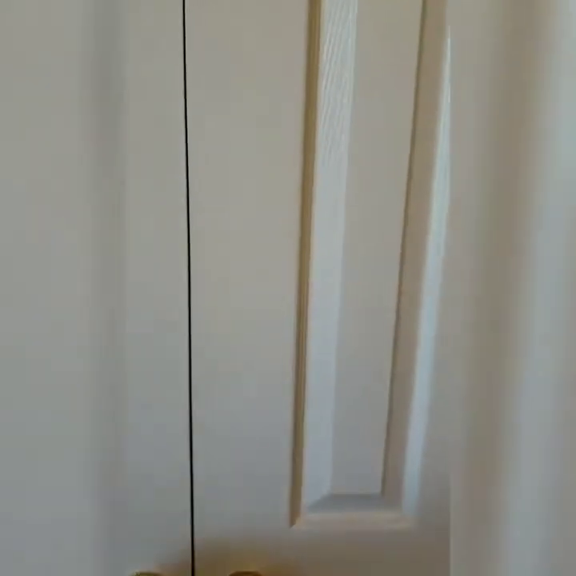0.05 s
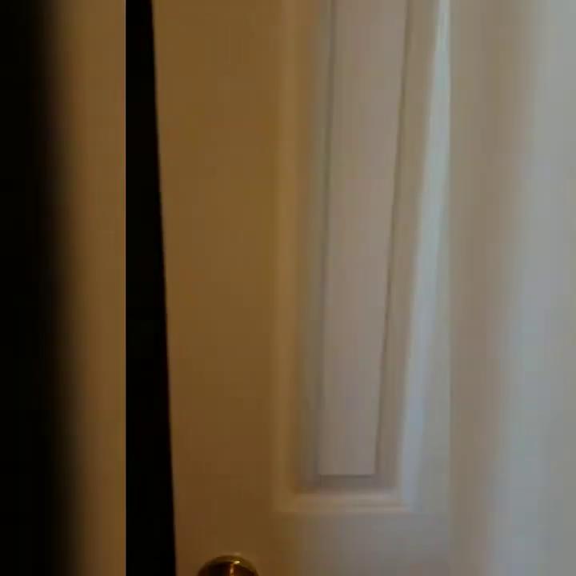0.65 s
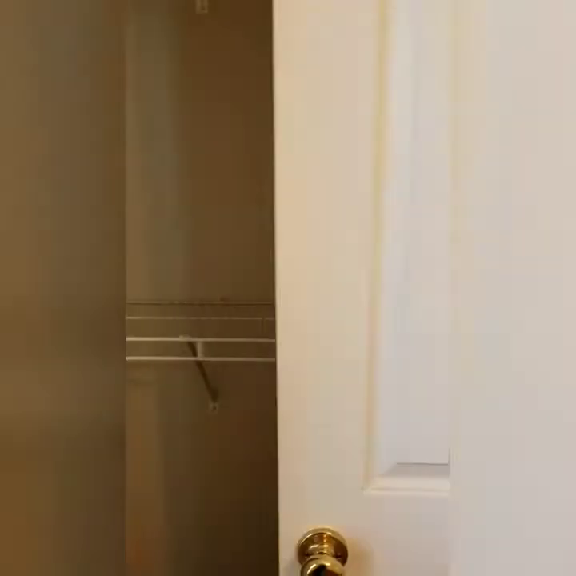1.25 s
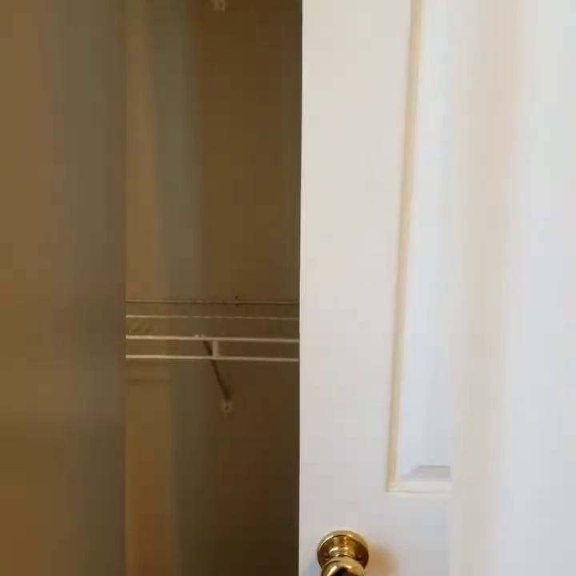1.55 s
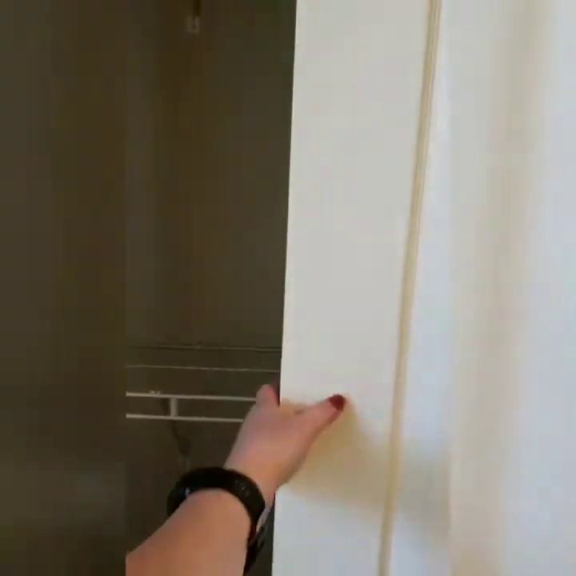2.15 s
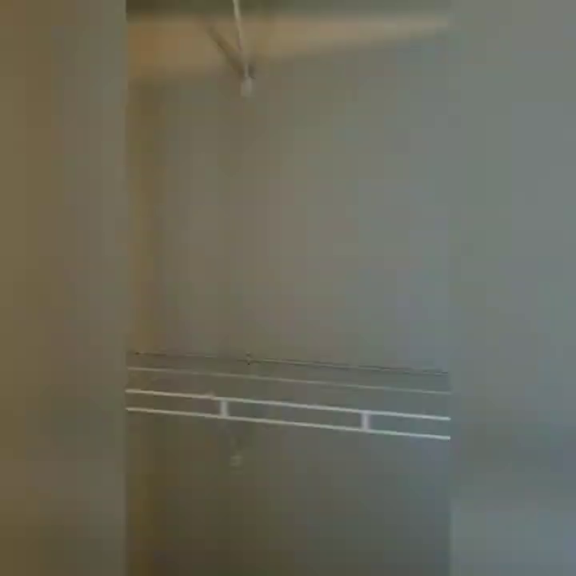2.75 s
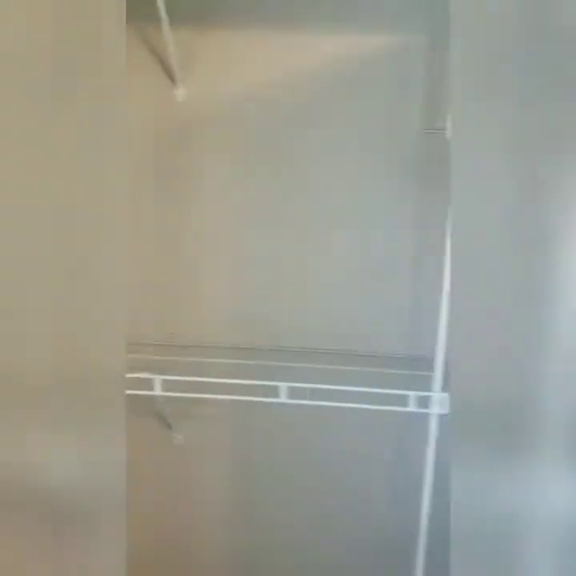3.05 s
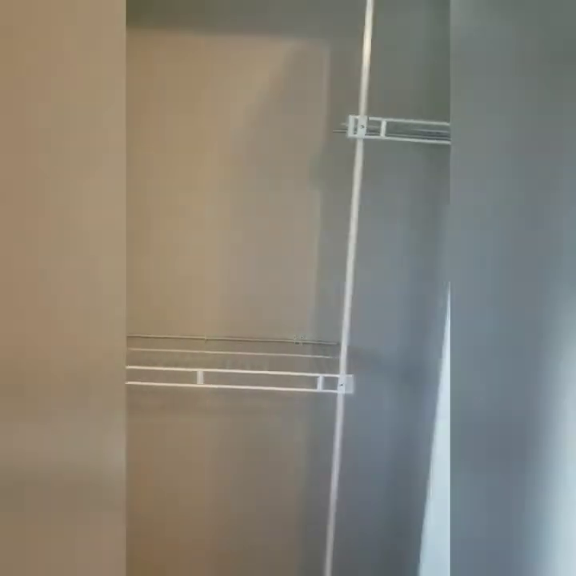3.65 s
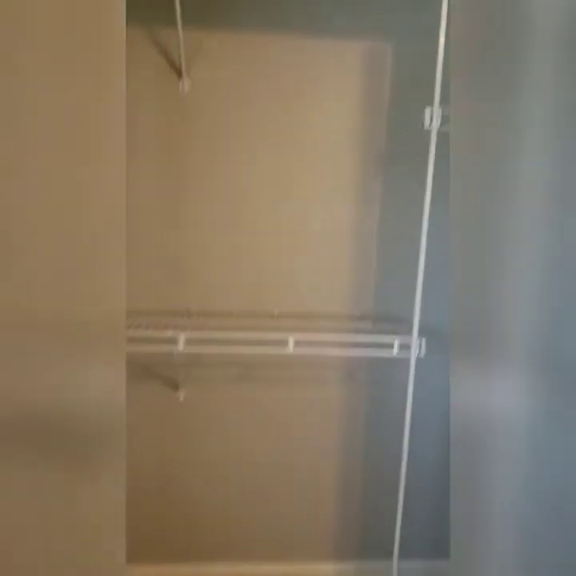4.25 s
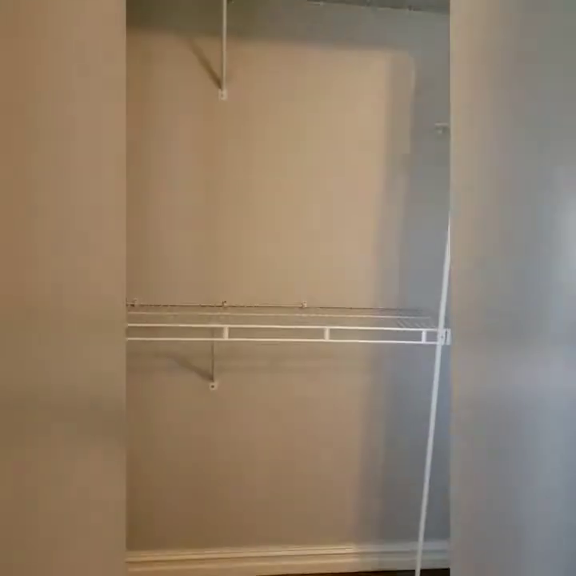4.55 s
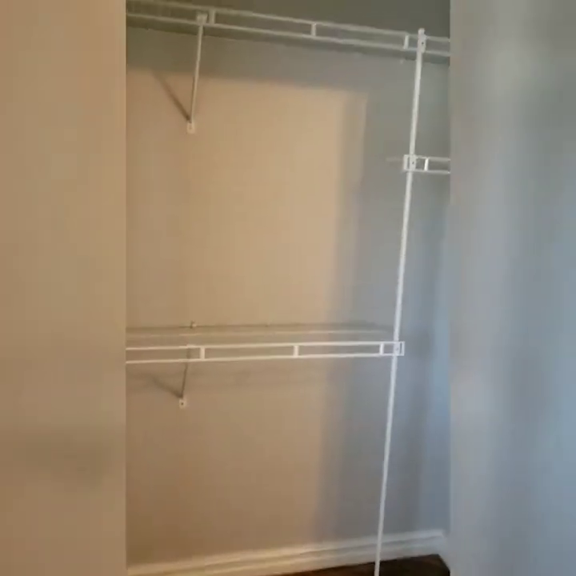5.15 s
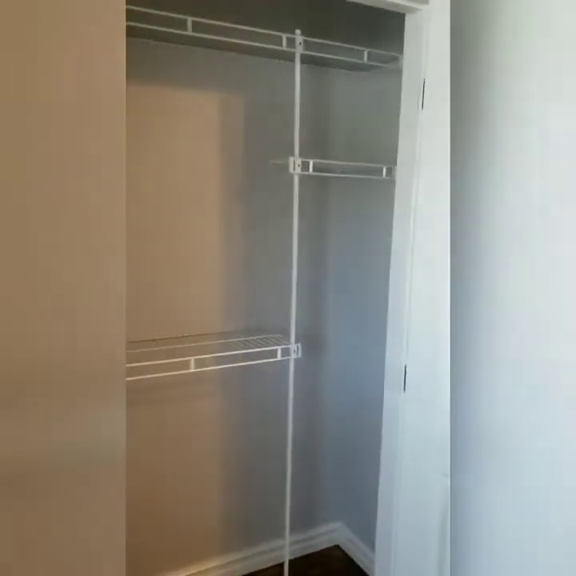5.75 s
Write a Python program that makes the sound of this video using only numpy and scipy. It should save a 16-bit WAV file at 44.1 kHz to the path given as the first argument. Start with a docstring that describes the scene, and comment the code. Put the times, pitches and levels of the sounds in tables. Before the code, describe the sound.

Closet doors pop and drag open one after the other in a bare room, followed by soft cloth rustle and one sharp, close click.

```python
"""An empty, ringing room, heard from the two microphones of a hand-held phone near two hollow closet doors.
Ventilation hums underneath and clothes swish as the person reaches out. At 0.5 s the first door pops out of
its ball catch; from 2.2 s the second drags on the frame until its catch lets go. Shifting weight bumps the
floor. From 3.9 s the ventilation fades as the phone moves into the closet; cloth rasps as the body turns,
and at 4.6 s a finger clicks against the case, right at the microphones."""
import sys
import numpy as np
from scipy import signal
from scipy.fft import rfft, irfft, next_fast_len
from scipy.io import wavfile
from scipy.ndimage import uniform_filter1d, map_coordinates

SR = 44100
rng = np.random.default_rng(int(sys.argv[2]) if len(sys.argv) > 2 else 0)


def put_to_file(sound):
    """Save the sound as 16-bit audio at rate SR, in the file named by the first command-line argument."""
    columns = np.atleast_2d(sound).T  # one column per channel
    safe = np.clip(columns, -1, 1)
    whole_steps = np.round(safe * 32767)
    wavfile.write(sys.argv[1], SR, whole_steps.astype(np.int16))


N = 264550
MIC_DELAY_S = .00045  # sound's travel time between the two microphones


def amp(db):
    """Decibels to gain."""
    return 10 ** (np.asarray(db) / 20)


def unit(x):
    """Scale to rms 1."""
    return x / np.sqrt(np.mean(x ** 2) + 1e-20)


def along(points, hz):
    """(Hz, value) points read on a log axis."""
    freqs, values = np.transpose(points)
    return np.interp(np.log(hz + 1), np.log(freqs + 1), values)


def wobble(rate):
    """A smooth random curve, rate knots a second."""
    knots = rng.standard_normal(int(N * rate / SR) + 4)
    return map_coordinates(knots, [np.arange(N) * rate / SR])


def filtered(x, response):
    """x times a response of frequency."""
    n = x.shape[-1]
    padded = next_fast_len(n + SR // 4)
    return irfft(rfft(x, padded) * response(np.fft.rfftfreq(padded, 1 / SR)), padded)[..., :n]


def low_cut(x, hz, order=2):
    """x with its bass rolled off below hz."""
    return signal.sosfilt(signal.butter(order, hz, 'high', fs=SR, output='sos'), x)


def coloured(x, spectrum):
    """x with the given spectrum, at rms 1."""
    return unit(filtered(x, lambda hz: amp(along(spectrum, hz))))


def diffuse(size):
    """Noise from all sides: alike at both microphones in the bass, unrelated in the treble."""
    angle = lambda hz: np.arccos(.97 * np.sinc(2 * hz * MIC_DELAY_S)) / 2
    white = rng.standard_normal((2, size))
    mid, side = filtered(white, lambda hz: np.array([np.cos(angle(hz)), np.sin(angle(hz))]))
    return np.array([mid + side, mid - side])


def rush(spectrum, size=N):
    """Diffuse stereo noise with the given spectrum, at rms 1."""
    return coloured(diffuse(size), spectrum)


def add(track, s, sound):
    """Mix a sound in at time s."""
    part = track[..., round(s * SR):][..., :sound.shape[-1]]
    part += sound[..., :part.shape[-1]]


def onset(t, rise_s):
    """Gain swelling to 1 with time constant rise_s."""
    return 1 - np.exp(-t / rise_s)


def stroke(s, rise_s, t60, db):
    """Gain of one rubbing movement: it gathers speed smoothly, then dies away."""
    t = np.arange(N) / SR - s
    swell = np.sin(np.pi / 2 * np.clip(t / rise_s, 0, 1)) ** 2
    return swell * amp(db - 60 * np.maximum(t - rise_s, 0) / t60)


def ring(modes, t):
    """Damped modes, at slightly new strengths for each blow."""
    return sum(amp(db + rng.standard_normal() - 60 * t / t60) * np.sin(2 * np.pi * hz * t)
               for hz, db, t60 in modes)


def ring_from_left(modes, t):
    """Damped modes that reach the left microphone first."""
    return np.array([ring(modes, t), ring(modes, np.maximum(t - MIC_DELAY_S, 0))])


def soft(hz, corner_hz):
    """Gain of a contact of limited hardness: it excites little above its corner."""
    return 1 / np.sqrt(1 + (hz / corner_hz) ** 6)


def struck(modes, corner_hz):
    """The modes as such a contact excites them: the high ones stay nearly still."""
    return [(hz, db + 20 * np.log10(soft(hz, corner_hz)), t60) for hz, db, t60 in modes]


# moving air, out in the room: (frequency [Hz], density [dB])
VENT_SPECTRUM = [(20, -19.5), (90, -16.5), (120, -1), (160, -17), (290, -6.5), (390, -8), (490, -12),
                 (600, -26.5), (1000, -33), (3000, -43.5), (7000, -39), (9000, -46.5), (12000, -35.5),
                 (16000, -46)]

def ventilation():
    """A low rush of air and an unsteady motor hum; both fade as the phone enters the closet."""
    shelter_s, air_fade_db_per_s, hum_fade_db_per_s = 3.9, 3, 7.5
    hum_hz, drift_hz, swell_db = 121.8, 0.45, 3
    inside_s = np.maximum(np.arange(N) / SR - shelter_s, 0)
    phase = 2 * np.pi * np.cumsum(hum_hz + drift_hz * wobble(8.3)) / SR
    hum = unit(amp(swell_db * wobble(14)) * np.sin(phase))
    air = amp(-55 - air_fade_db_per_s * inside_s) * rush(VENT_SPECTRUM)
    return air + amp(-60.5 - hum_fade_db_per_s * inside_s) * hum


# cloth within arm's length of the microphones: (frequency [Hz], density [dB])
SLEEVE_SPECTRUM = [(350, -44.5), (700, -17), (1130, -30), (1550, -2), (1900, -3.5), (2950, -3),
                   (4050, -6.5), (6400, -6.5), (8600, -15), (14700, -13), (16000, -16.5)]
SHIRT_SPECTRUM = [(410, -3), (700, -0.5), (1060, -5), (1170, -5.5), (1260, -3), (2080, -6.5), (4550, -8.5),
                  (5400, -11), (7490, -10), (8210, -17), (11500, -13.5), (14500, -21), (16000, -17)]
# the arm reaches out, then the body turns: (time [s], rise [s], t60 [s], level [dB], shirt share [0-1])
CLOTH_SWISHES = [(0, 0.0033, 12, -57.5, 0.23), (.12, 0.15, 2.8, -57, 0.36), (1.515, 0.02, 1.26, -59, 1),
                 (1.57, 0.13, 0.6, -51.5, 0.03), (1.899, 0.12, 1.4, -58, 0.05),
                 (2.669, 0.045, 4.0, -54.5, 0.8), (3.02, 0.061, 0.98, -49.5, 0.13),
                 (3.76, 0.28, 4.1, -57.5, 0.35), (4.28, 0.018, 4.1, -52, 0.9), (4.33, 0.17, 0.15, -48, 0.6),
                 (4.599, 0.18, 0.92, -50, 1), (4.93, 0.11, 3, -56.5, 0.5), (5.21, 0.04, 0.97, -52, 0.53)]

def clothes():
    """Cloth brushes on cloth in small uneven snags; each swish is part sleeve, part shirt."""
    sleeve_power, shirt_power = np.zeros((2, N))
    for s, rise_s, t60, db, shirt_share in CLOTH_SWISHES:
        power = stroke(s, rise_s, t60, db) ** 2
        sleeve_power += (1 - shirt_share) * power
        shirt_power += shirt_share * power
    snags = unit(amp(.9 * wobble(35) + 1.5 * wobble(600)))
    sleeve = np.sqrt(sleeve_power) * rush(SLEEVE_SPECTRUM)
    shirt = np.sqrt(shirt_power) * rush(SHIRT_SPECTRUM)
    return snags * (sleeve + shirt)


# resonances of catch, knob and skin, one list a door: (frequency [Hz], width [Hz], level [dB])
DOOR_HARDWARE = [
    [(815, 70, 4), (1076, 36, -2), (1320, 21, 2), (1503, 94, 0.5), (1820, 110, -1.5), (2250, 69, -4.5),
     (2470, 52, -2), (2660, 56, 0.5), (2884, 130, -1), (3856, 76, -4.5), (4310, 130, -1.5)],
    [(825, 21, -9), (920, 25, -9.5), (1070, 27, -13.5), (1407, 50, -10.5), (1500, 50, -6), (1680, 30, -7.5),
     (1900, 34, -5.5), (2144, 77, -3), (2580, 47, -11), (2845, 63, -5), (2980, 70, -13), (3330, 70, -6),
     (3930, 97, -2.5), (4360, 96, 1.5), (4950, 82, -7)],
]

def contact(hz, corner_hz, door):
    """A softer contact excites less treble; the door's hardware lifts its own resonances."""
    lift_db = (3, 4.5)[door]
    peaks = sum(amp(db + lift_db) ** 2 / (1 + (2 * (hz - centre) / width) ** 2)
                for centre, width, db in DOOR_HARDWARE[door])
    return np.sqrt(.45 + peaks) * soft(hz, corner_hz)


# an edge rubbing on the frame, one list a door: (time [s], rise [s], t60 [s], relative level [dB])
DOOR_DRAGS = [
    [(.389, 0.013, 0.41, -42.5)],
    [(2.206, 0.011, 0.78, -29.5), (2.225, 0.12, 0.26, -23)],
]
# friction heard through the wood: (frequency [Hz], density [dB])
SCRAPE_SPECTRUM = [(25, -13.5), (115, -16.5), (168, 3), (232, -6.5), (303, 3), (355, -12), (425, 6),
                   (520, -2.5), (600, 0.5), (700, -12), (830, -9), (1000, -9.5), (1400, -14.5),
                   (2900, -14.5), (3600, -23), (5300, -29), (6800, -26), (9300, -43), (14000, -31.5)]

def door_drags():
    """The door edge sticks and slips on the frame at an uneven rate; each slip is a burst of friction."""
    typical_slip_hz, spread_db, burst_t60, corner_hz = 110.06, 3.5, .022, 12000
    slip_count = np.floor(np.cumsum(typical_slip_hz * amp(3 * wobble(60))) / SR)
    slips = np.diff(slip_count, prepend=0) * amp(spread_db * rng.standard_normal(N))
    burst = amp(-60 * np.arange(SR // 20) / SR / burst_t60)
    rattle = signal.fftconvolve(slips, burst)[:N] + .15  # some steady rub between slips
    friction = coloured(rattle * diffuse(N), SCRAPE_SPECTRUM)
    scrape = np.zeros((2, N))
    for door, drags in enumerate(DOOR_DRAGS):
        pull = sum(stroke(*drag) for drag in drags)
        scrape += pull * unit(filtered(friction, lambda hz: contact(hz, corner_hz, door)))
    return amp(-2) * scrape + amp(-3.5) * room(scrape)


# reverberation of the bare room around the microphones: (frequency [Hz], t60 [s])
ROOM_DECAY = [(60, 1.1), (160, 0.36), (420, 1.14), (1100, 1.7), (2900, 1.06), (7000, 1.06), (15000, 0.61)]

def room_tail(noise):
    """Noise as a tail in the bare room: it builds up, beats unevenly and lasts longest in the mids."""
    hz, t, bands = signal.stft(noise, SR, nperseg=512)
    beating = uniform_filter1d(rng.standard_normal(bands.shape[1:]), size=2, axis=0)
    beating = unit(uniform_filter1d(beating, size=6, axis=1))
    depth_db = 3 * np.clip(hz[:, None] / 1000, 0, 1)
    decay_db = 60 * t / along(ROOM_DECAY, hz)[:, None]
    tail = signal.istft(bands * amp(depth_db * beating - decay_db), SR, nperseg=512)[1]
    return tail * onset(np.arange(tail.shape[1]) / SR, rise_s=0.0011)


def room(x):
    """The room's answer to a sound, reaching the microphones from all sides."""
    tail = room_tail(diffuse(3 * SR // 2))
    return signal.fftconvolve(x.mean(0, keepdims=True), tail / np.linalg.norm(tail[0]), axes=1)[:, :N]


# jolts at arm's length, one list a door; levels are relative within each column:
# (time [s], panel thud [dB], panel ring [dB], edge crack [dB], hardness corner [Hz])
DOOR_JOLTS = [
    [(.391, -35, -40, -37, 6600), (.394, -26, -29.5, -69, 188), (.403, -26.5, -33.5, -36, 3020),
     (0.427, -29, -43, -37.5, 6050), (.4893, -37, -59, -13.5, 19100), (.502, -14.5, -20.5, -50, 12100),
     (.562, -22, -30, -25, 13900), (.655, -30, -34, -38, 2500), (.757, -30.5, -29.5, -43, 1100),
     (.793, -24.5, -34.5, -47, 700), (.928, -37.5, -39, -66, 600)],
    [(2.211, -26, -43, -29.5, 6140), (2.218, -28, -29, -36, 3000), (2.251, -22.5, -36, -30, 1200),
     (2.284, -23, -24, -30, 1100), (2.315, -19, -22.5, -24, 1200), (2.338, -26, -31, -25, 10400),
     (2.347, -32, -33, -25.5, 3300), (2.377, -39, -38.5, -22.5, 2500), (2.405, -37, -35, -29, 1790),
     (2.492, -46, -50, -38, 2300), (2.511, -40, -40.5, -43, 1100), (3.641, -58, -61, -64, 900)],
]
# the hollow panel, one list a door: (frequency [Hz], level [dB], t60 [s])
PANEL_MODES = [
    [(48, -6.5, 0.15), (87, -17, 0.18), (116, -17, 0.22), (160.2, -6.5, 0.35), (183, -18.5, 0.27),
     (268.4, -10, 0.57), (292, 1, 0.13), (325, 6, 0.056), (385, -7, 0.31), (467.6, -9, 0.31),
     (510.6, 2, 0.12), (803, -15.5, 0.47)],
    [(38, -10, 0.19), (90, -24, 0.2), (155, 0, 0.18), (181.5, 1.5, 0.16), (304.8, 4, 0.2),
     (326.4, -5.5, 0.4), (398.5, -3.5, 0.53), (433, -8.5, 0.55), (453, -12, 0.8), (512, -12.5, 0.77),
     (575, -15, 0.65), (629, -14, 0.43)],
]
# the panel's dense, quickly damped modes, and the edge's crack: (frequency [Hz], density [dB])
THUD_SPECTRUM = [(20, -13), (60, 0), (120, 6.5), (300, 6.5), (520, -5), (700, -5), (1500, -41.5),
                 (4000, -51), (8000, -78)]
CRACK_SPECTRUM = [(150, -31), (490, 3), (830, -3.5), (1100, -3.5), (1600, -1), (2500, -2.5), (2950, -2.5),
                  (3450, -4), (3900, -1.5), (5000, -5.5), (7000, -5.5), (8600, -11.5), (11700, -8),
                  (16000, -20.5)]

def door_jolts():
    """Each jolt booms the door's hollow panel, cracks its edge and rings its hardware."""
    thud_t60, crack_t60 = 0.011, 0.056
    t = np.arange(3 * SR // 2) / SR
    boom_t = t[:SR // 2]
    booms, knocks = np.zeros((2, 2, N))
    thuds, cracks = rush(THUD_SPECTRUM), rush(CRACK_SPECTRUM)
    piece = lambda noise: noise[:, rng.integers(N - len(t)):][:, :len(t)]
    for door, (panel, jolts) in enumerate(zip(PANEL_MODES, DOOR_JOLTS)):
        for s, thud_db, ring_db, crack_db, corner_hz in jolts:
            boom = ring(struck(panel, corner_hz), boom_t) * onset(boom_t, rise_s=0.0027)
            add(booms, s, amp(ring_db) * boom)
            thud = amp(thud_db) * filtered(piece(thuds), lambda hz: soft(hz, corner_hz))
            crack = amp(crack_db) * filtered(piece(cracks), lambda hz: contact(hz, corner_hz, door))
            direct = thud * amp(-17 - 60 * t / thud_t60) + crack * amp(-3.5 - 60 * t / crack_t60)
            add(knocks, s, direct * onset(t, rise_s=0.001))
            add(knocks, s, amp(crack_db - 17.5) * hardware_ring(door, corner_hz))
            add(knocks, s, room_tail(amp(-10.5) * thud + amp(-9) * crack))
    return booms + amp(-6) * room(booms) + knocks


def hardware_ring(door, corner_hz):
    """The jolted hardware rings as separate tones, the narrowest longest."""
    t = np.arange(SR // 5) / SR
    modes = [(hz, db, np.log(1000) / np.pi / width) for hz, width, db in DOOR_HARDWARE[door]]
    return ring_from_left(struck(modes, corner_hz), t) * onset(t, rise_s=0.0033)


# each door's ball catch lets go: (time [s], level [dB])
CATCH_SNAPS = [(0.4889, -17), (2.338, -31)]
# the ball's snap: (frequency [Hz], density [dB])
CATCH_SPECTRUM = [(1500, -21.5), (2800, 5), (3450, -10.5), (3900, 4), (7000, 4), (9000, -19), (12000, -3),
                  (16000, -11)]
# the catch and its strike plate: (frequency [Hz], level [dB], t60 [s])
PLATE_MODES = [(752, -6, 0.04), (1440, 3, 0.038), (1800, 6.5, .025), (2240, 0, 0.026), (2966, 0, .04),
               (3876, 2.5, 0.032), (4770, -7, .025)]

def ball_catches():
    """The spring ball snaps out: a bright crack that rings the strike plate and sizzles on in the room."""
    snap_t60, sizzle_low_hz = 0.029, 8000
    out, t = np.zeros((2, N)), np.arange(SR // 5) / SR
    for s, db in CATCH_SNAPS:
        add(out, s, amp(db - 60 * t / snap_t60) * rush(CATCH_SPECTRUM, len(t)))
        add(out, s, amp(db - 3) * ring_from_left(PLATE_MODES, t) * onset(t, rise_s=0.00078))
        sizzle = filtered(rush(CATCH_SPECTRUM, SR), lambda hz: 1 - soft(hz, sizzle_low_hz))
        add(out, s, amp(db - 15) * room_tail(sizzle))
    return out


# the floor below the microphones: (time [s], relative level [dB])
FLOOR_BUMPS = [(1.531, -56.5), (2.821, -63), (2.912, -60.5), (4.422, -74)]
# its dull thump: (frequency [Hz], density [dB])
FLOOR_SPECTRUM = [(20, -4.5), (50, -7), (75, 13.5), (110, -15), (300, -22), (1500, -61)]

def floor_bumps():
    """The floor gives a dull bump under shifting weight."""
    out, t = np.zeros((2, N)), np.arange(SR // 2) / SR
    envelope = t / 0.012 * np.exp(1 - t / 0.04)  # peaks after 40 ms
    for s, db in FLOOR_BUMPS:
        add(out, s, amp(db) * rush(FLOOR_SPECTRUM, len(t)) * envelope)
    return out


# cloth rubbing near the microphones as the body turns: (time [s], rise [s], t60 [s], level [dB])
CLOTH_RASPS = [(4.293, 0.012, 0.33, -53.5), (4.4, 0.069, 0.25, -51), (4.959, 0.0076, 1, -51.5),
               (5.213, 0.012, 0.84, -57)]
# the cloth's rasp: (frequency [Hz], density [dB])
RASP_SPECTRUM = [(400, -17.5), (1400, -17), (2400, -2), (3400, -3.5), (3750, -0.5), (4400, 2), (5100, -4),
                 (6000, -10), (15000, -17)]

def cloth_rasps():
    """Cloth rubs as the body turns: a gritty rasp at 2-5 kHz, narrower in band than the swishes."""
    grit = unit(amp(3 * wobble(500) + 1.1 * wobble(45)))
    return sum(stroke(*rasp) for rasp in CLOTH_RASPS) * grit * rush(RASP_SPECTRUM)


# a finger on the case, right at the microphones; levels are relative within each column:
# (time [s], shell knock [dB], tick [dB], snap [dB], scatter [dB])
FINGER_CLICKS = [(4.552, -38.5, -45, -52, -74), (4.5755, -39, -25.5, -20.5, -78.5),
                 (4.6056, -49, -33.5, -24.5, -66), (4.642, -3, -6, -19.5, -30.5),
                 (4.656, -34, -27, -21, -53.5), (4.7735, -26, -18.5, -28, -31),
                 (4.7954, -36, -35, -36, -51)]
# the case's knock: (frequency [Hz], level [dB], t60 [s], left minus right [dB])
SHELL_MODES = [(120, -13.5, 0.011, -5.5), (470, -11, 0.021, 4.5), (750, -3, 0.0089, 7),
               (995, 6.5, 0.0031, -4.5), (1410, 0, 0.004, -9), (1990, -8, 0.0093, 1.5),
               (3430, -15.5, 0.0023, 2)]
# the case's high modes: (frequency [Hz], level [dB], t60 [s])
TICK_MODES = [(3330, -3.5, 0.0053), (3950, -0.5, 0.0031), (4900, -6.5, 0.0034), (7800, -4.5, 0.0017),
              (10900, -8, 0.0016)]
# a click thrown back by the hand and the door close by: (frequency [Hz], density [dB])
SCATTER_SPECTRUM = [(100, -22.5), (450, 0), (1000, -4.5), (2000, -5.5), (3800, 1), (5500, -6.5),
                    (8000, -14), (11000, -17.5), (16000, -19.5)]

def finger_clicks():
    """The case carries each click to both microphones, the right first; a little escapes into the room."""
    left_delay_s, scatter_t60 = .00033, 0.095
    out, t = np.zeros((2, N)), np.arange(SR // 10) / SR
    hz, db, t60, pan_db = np.transpose(SHELL_MODES)[:, :, None]
    polarity = -(-1) ** np.arange(len(SHELL_MODES))[:, None]
    modes = polarity * amp(db - 60 * t / t60) * np.sin(2 * np.pi * hz * t)
    shell = [np.sum(modes * amp(side * pan_db / 2), axis=0) for side in (1, -1)]
    knock_left, knock_right = low_cut(shell, hz=240)  # a small shell gives little bass
    snap = low_cut(signal.unit_impulse(len(t)), hz=2200, order=1)
    for s, knock_db, tick_db, snap_db, scatter_db in FINGER_CLICKS:
        tick = low_cut(ring(TICK_MODES, t) * onset(t, rise_s=0.00046), hz=1800)
        left = amp(knock_db) * knock_left + amp(tick_db - 3.5) * tick + amp(snap_db - 12) * snap
        right = amp(knock_db) * knock_right + amp(tick_db + 5.5) * tick + amp(snap_db) * snap
        add(out[0], s + left_delay_s, left)
        add(out[1], s, right)
        scatter = rush(SCATTER_SPECTRUM, len(t)) * onset(t, rise_s=.009)
        add(out, s, amp(scatter_db - 60 * t / scatter_t60) * scatter)
    return out + amp(-28) * room(out)


def scene():
    """The room, the doors and the person's movements, as they reach the phone."""
    doors = door_jolts() + ball_catches() + door_drags()
    person = clothes() + cloth_rasps() + floor_bumps() + finger_clicks()
    return doors + person + ventilation()


def record(dry):
    """The phone keeps nothing above its band limit."""
    top_hz = 16000
    return filtered(dry, lambda hz: 1 / np.sqrt(1 + (hz / top_hz) ** 240))


dry = scene()
out = record(dry)
put_to_file(out)
```